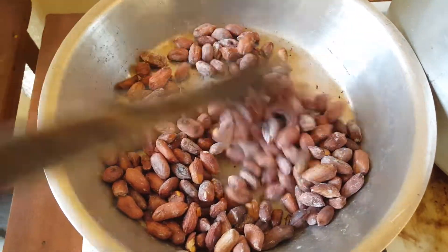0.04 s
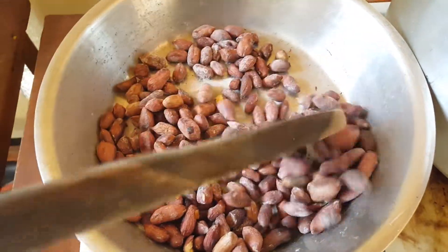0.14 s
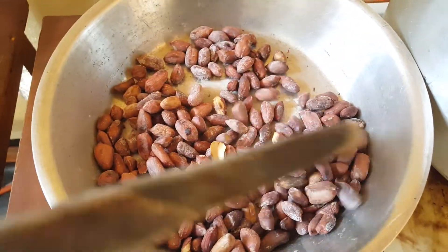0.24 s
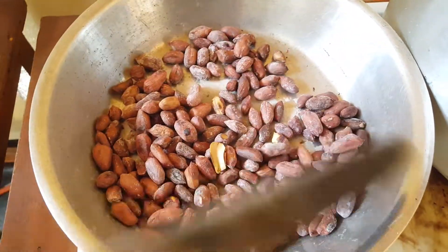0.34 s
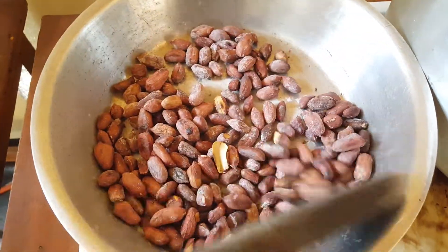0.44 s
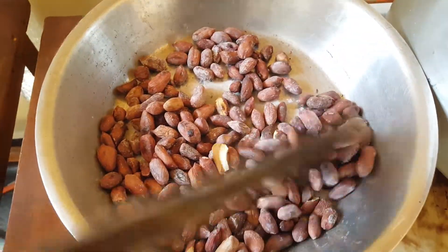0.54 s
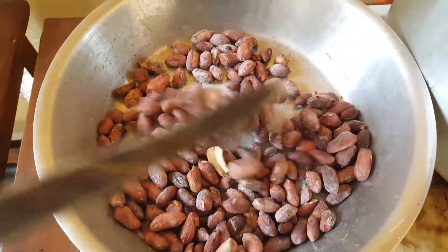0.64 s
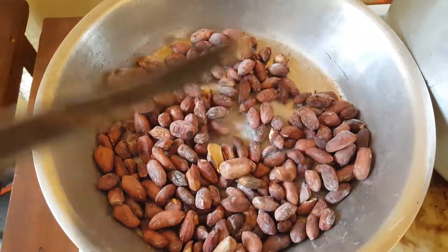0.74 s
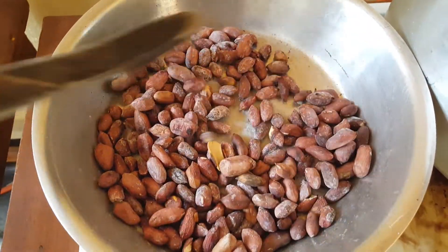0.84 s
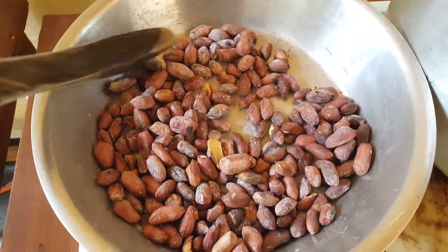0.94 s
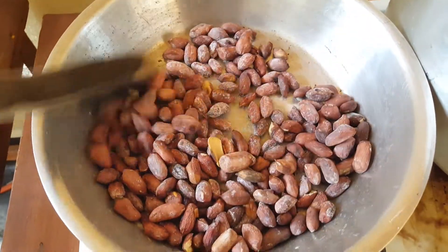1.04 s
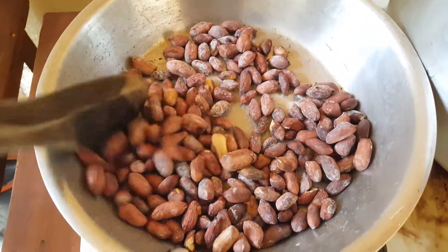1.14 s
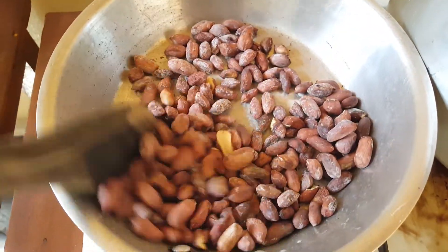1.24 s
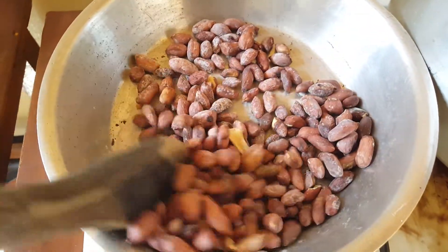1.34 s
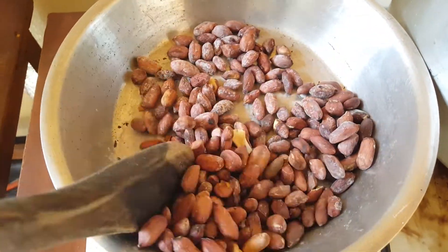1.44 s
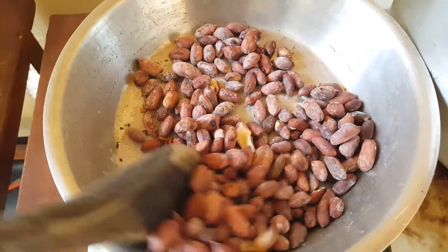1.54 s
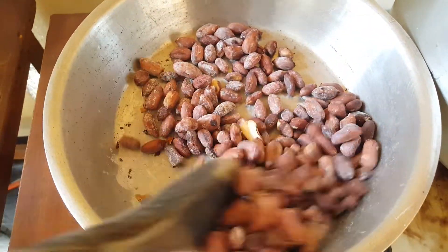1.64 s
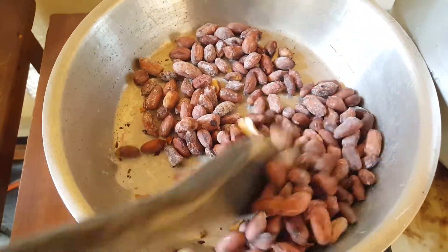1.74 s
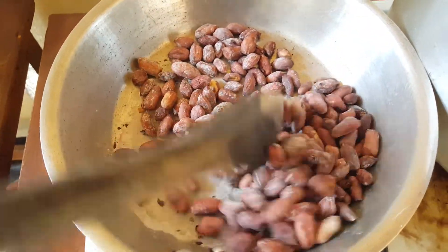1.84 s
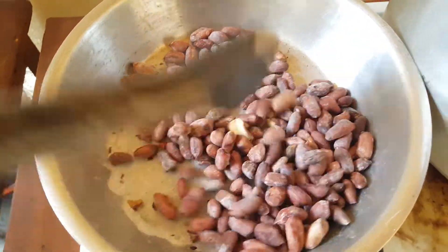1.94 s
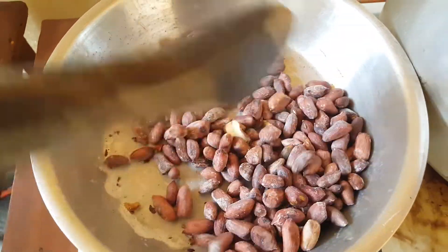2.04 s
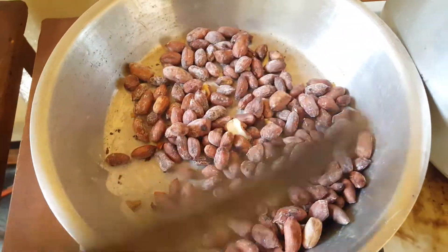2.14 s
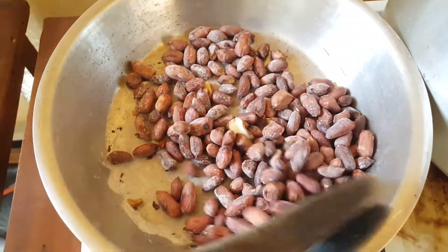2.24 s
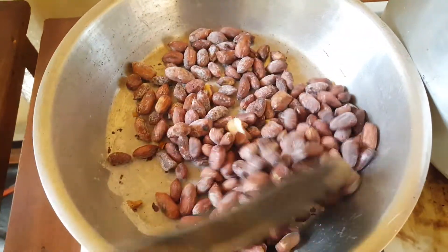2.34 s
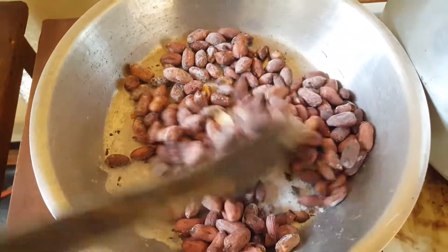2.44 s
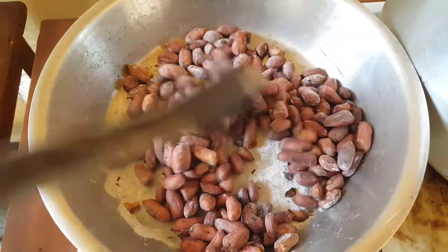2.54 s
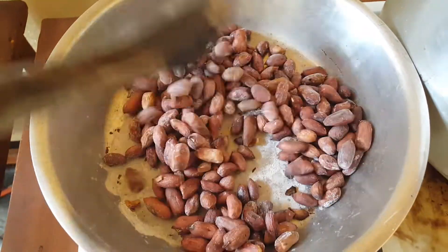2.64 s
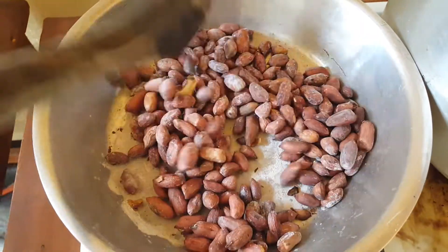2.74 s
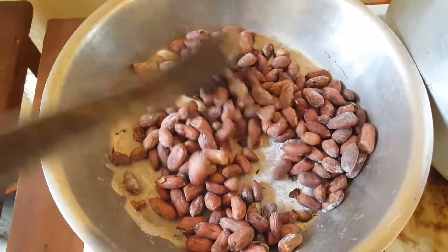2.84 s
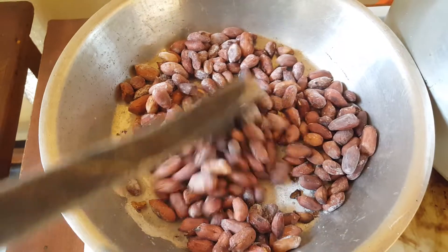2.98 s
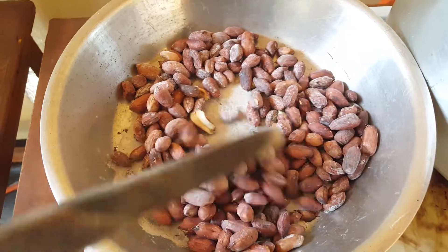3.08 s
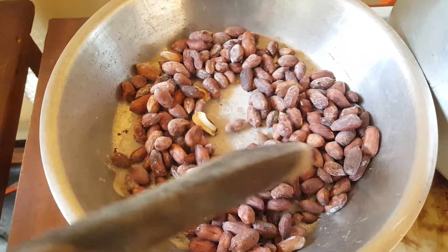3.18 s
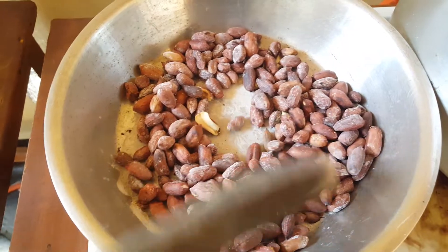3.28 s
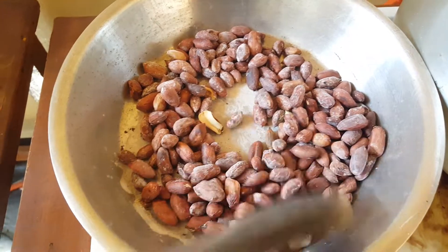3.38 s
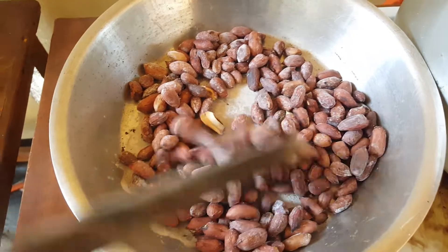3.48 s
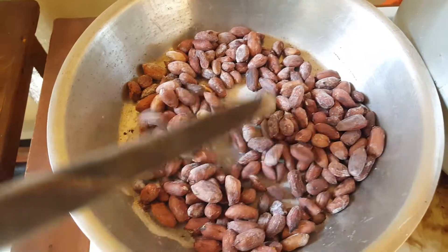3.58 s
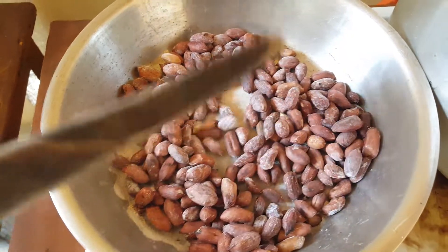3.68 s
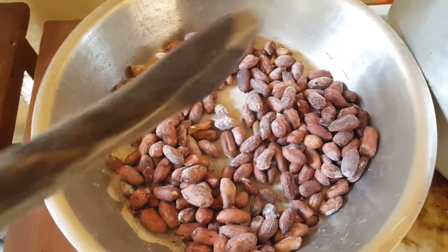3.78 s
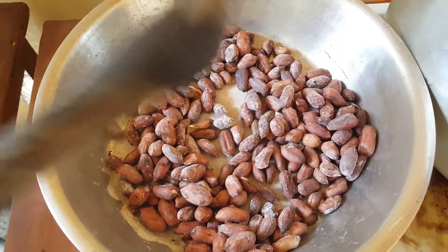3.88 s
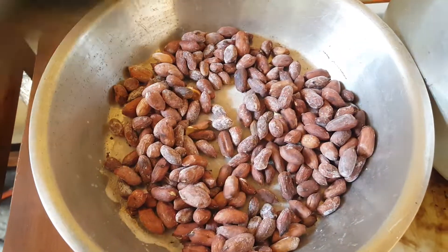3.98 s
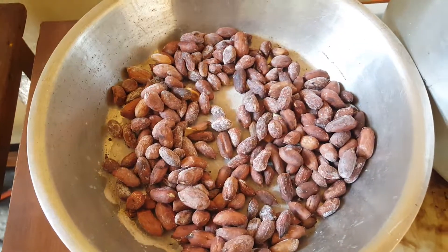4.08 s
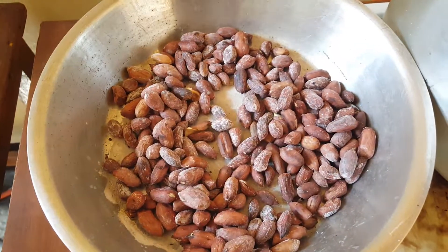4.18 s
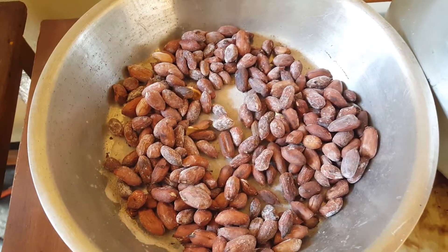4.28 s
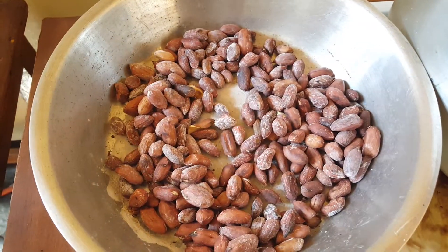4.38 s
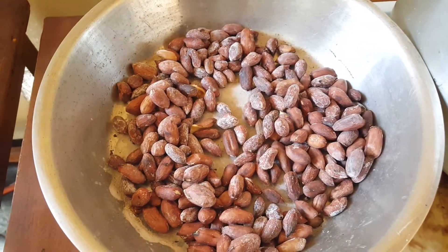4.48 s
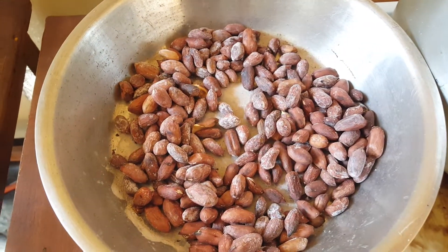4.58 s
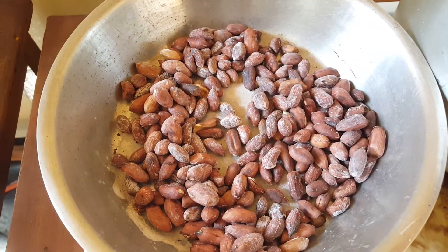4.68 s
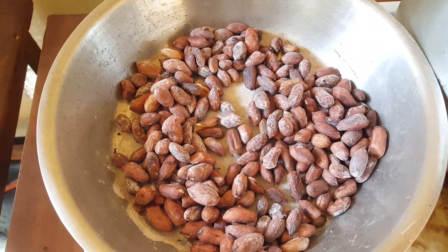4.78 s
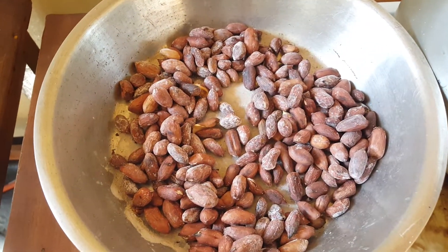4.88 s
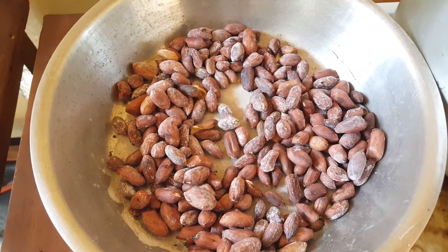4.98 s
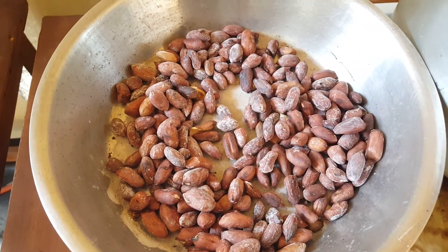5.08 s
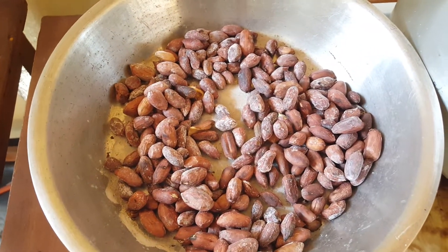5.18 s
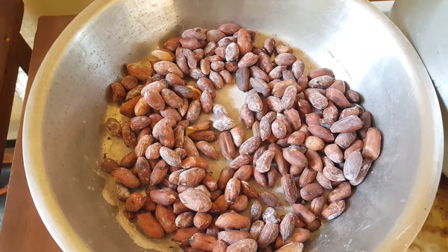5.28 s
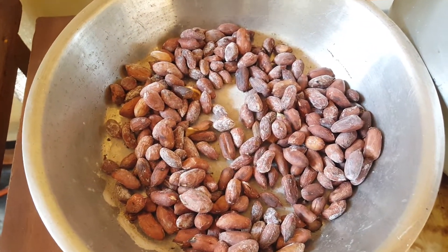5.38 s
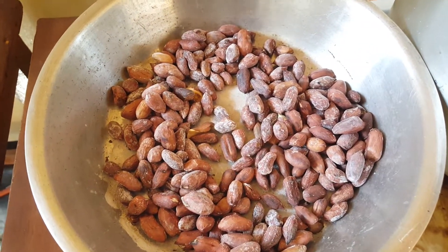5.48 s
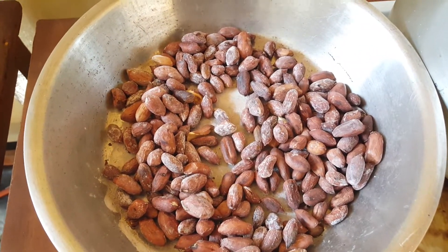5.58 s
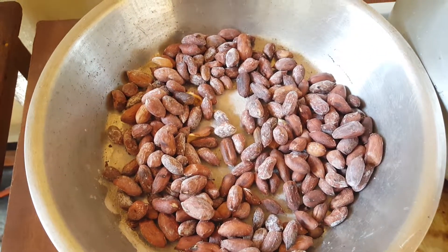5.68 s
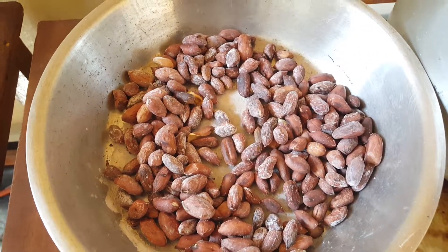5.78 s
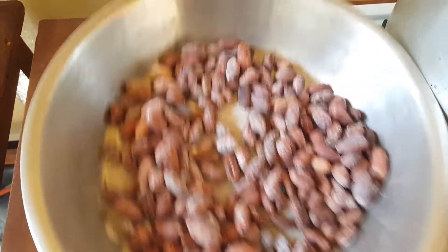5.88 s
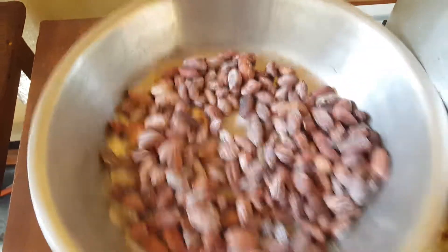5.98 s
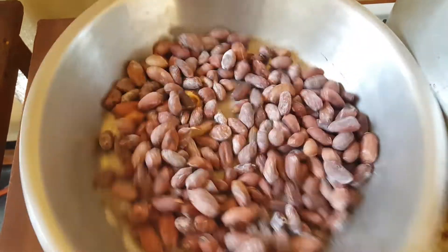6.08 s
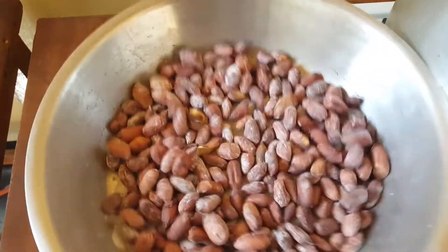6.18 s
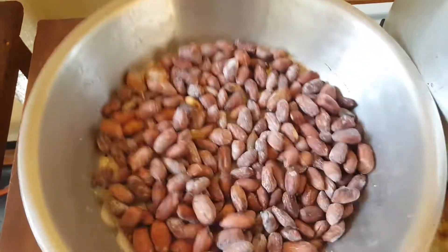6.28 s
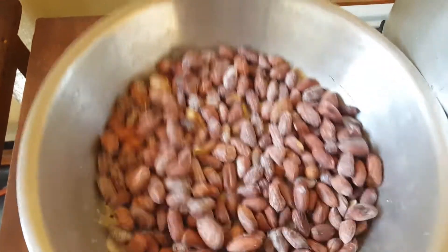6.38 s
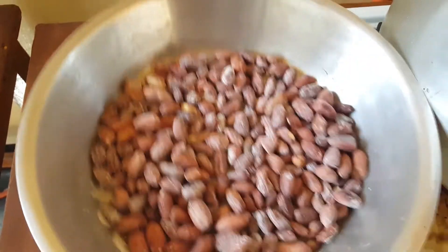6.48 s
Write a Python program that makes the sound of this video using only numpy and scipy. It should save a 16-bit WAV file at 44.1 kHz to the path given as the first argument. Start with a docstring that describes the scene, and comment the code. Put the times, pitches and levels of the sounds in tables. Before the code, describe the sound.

Nuts clatter and knock on ringing metal as they are stirred, then faint ticking, a wooden thud on the table, and a final rattling shake.

```python
"""Nuts tumble and knock on a thin metal pan as a wooden spatula stirs them, close by in a small kitchen.
The blade scrapes the bottom; the spatula is laid on the table; hot skins tick, and a far whistle
swells in the pause; at the end the pan is shaken. Random contacts drive pan modes and noise bursts;
knocks and table blows are decaying modes with noise, ticks short sines, whistle and air shaped noise."""
import sys
import numpy as np
from scipy import signal
from scipy.fft import rfft, irfft
from scipy.io import wavfile

SR = 44100
rng = np.random.default_rng(int(sys.argv[2]) if len(sys.argv) > 2 else 0)


def amplitude_ratio(level_db):
    """Convert a level in decibels to the matching linear amplitude (field) ratio."""
    exponent = np.asarray(level_db, float) / 20
    return 10 ** exponent


def transcribe(signal):
    """Save signal, clipped to [-1, 1], as a 16-bit WAV file at the path in sys.argv[1]."""
    frames = np.atleast_2d(signal).T
    limited = np.clip(frames, -1, 1)
    pcm = np.round(limited * 32767).astype(np.int16)
    wavfile.write(sys.argv[1], SR, pcm)


N = 287528
RING_SAMPLES = SR * 7 // 10

# loaded pan modes: (frequency [Hz], level [dB], t60 [s])
PAN_MODES = [(80, -4, .2), (144, 0, .4), (234, -9.5, .13), (313, -8, .15), (372, -1, .13), (389, -1, .13),
             (515, -8, .12), (593, -8, .1), (779, -3, .06), (871, -2, .08), (1013, 0, .06), (1105, -1, .08),
             (1245, -4, .06), (1450, -2, .06), (1580, 4, .13), (1640, -2, .07), (1800, -4, .06),
             (2260, -2, .06), (2415, -1, .06), (2520, -4, .06), (2800, -8, .05), (3000, -11, .04),
             (3600, -16, .04), (3264, -8, .085), (4370, -23, .04), (4644, -22, .045), (5070, -22, .04),
             (5390, -22, .05), (6080, -27, .04)]
PAN_HZ = np.array(PAN_MODES)[:, 0]
# edges of the sway, bottom, and wall and rim registers: (frequency [Hz])
REGISTER_EDGES_HZ = [0, 190, 620, 20000]
# countless small modes, damped and shifted by nuts on the metal: (frequency [Hz], level [dB per Hz])
CLATTER_SPECTRUM = [(110, -4), (180, -16), (274, -19), (383, -4.5), (465, -13), (508, -14), (1100, -3),
                    (1290, -10.5), (1590, -4), (2030, -7.5), (2380, -4), (3630, -25.5), (12000, -58),
                    (15600, -74), (22000, -120)]
# scraping colour: (frequency [Hz], level [dB per Hz])
SCRAPE_SPECTRUM = [(1760, -44), (3000, -3), (3380, -4), (4050, -10.5), (5480, -10), (7150, -13),
                   (8880, -10.5), (10100, -17.5), (14000, -14), (16000, -20)]
# spatula sweeps through the nuts:
# (start [s], length [s], tumbling nuts [dB], push on the bottom [dB], blade and skins scraping [dB])
SWEEPS = [(0.0, 0.16, -31, -43, -42), (.47, 0.096, -69, -48.5, -51.5), (.61, 0.14, -39, -43.5, -52.5),
          (1.05, 0.16, -40, -37.5, -46), (1.21, 0.18, -37, -40, -38), (1.6, 0.18, -38, -50, -44.5),
          (1.8, 0.127, -35.5, -52, -51.5), (1.92, 0.11, -37.5, -40, -54), (2.29, 0.18, -34.5, -39, -44),
          (2.45, 0.13, -31, -47, -42), (2.68, 0.146, -37.5, -77, -55), (2.85, 0.1, -32, -39, -45.5),
          (3.0, 0.11, -31, -40.5, -42.5), (3.4, 0.15, -42.5, -41, -50.5), (3.7, 0.034, -41, -56, -57)]
# jerks of the hand shaking the pan:
# (start [s], length [s], tumbling nuts [dB], push on the bottom [dB], skins scraping [dB])
SHAKES = [(5.82, .06, -59.5, -49.5, -70), (5.9, 0.071, -41, -41, -44), (6.02, 0.038, -31, -27, -38),
          (6.12, 0.11, -30.5, -29.5, -39), (6.3, .25, -34.5, -30.5, -42.5)]
# room tone colour: (frequency [Hz], level [dB per Hz])
AIR_SPECTRUM = [(15, -26), (25, -13), (87, -6.5), (114, -12), (161, -11), (180, -29), (212, -13.5),
                (363, -22), (439, -20), (754, -27.5), (1330, -24.5), (1480, -26.5), (6210, -44),
                (14400, -49), (16000, -38)]
# room tone: (frequency [Hz], left-right likeness [-1..1])
LIKENESS = [(60, 1), (180, 0.97), (550, 0.67), (1650, -0.31), (4970, 0.16), (15000, -0.27)]
# echo decay: (frequency [Hz], t60 [s])
KITCHEN_T60 = [(100, 0.66), (1000, 0.42), (4000, 0.19), (12000, 0.4)]
# clear knocks: (time [s], level [dB], pitch [Hz], boom re knock [dB], crack re knock [dB])
KNOCKS = [(0.049, -15.5, 1570, -8, -29), (0.068, -15, 1580, -24, -24), (0.121, -9, 890, -23, -22),
          (0.159, -26.5, 915, -35, -0.5), (0.212, -15, 1046, -37, -35), (0.24, -15.5, 960, -28, -31),
          (0.26, -5.5, 1830, -41, -54), (0.465, -15, 1547, -3, -49), (0.518, -22.5, 1670, -2.5, -16.5),
          (0.59, -17.5, 1140, -8, -16.5), (0.623, -15.5, 1060, -12, -25), (0.647, -11.5, 1010, -11, -25.5),
          (0.679, -10.5, 1010, -17, -19.5), (0.751, -27, 970, -26, -14.5), (0.772, -13, 1580, -26, -14.5),
          (0.907, -31, 1640, -31, -23), (0.921, -28, 1600, 2.5, -20), (0.93, -17, 1650, 0, -22),
          (0.938, -10.5, 2310, -16, -24), (0.948, -7.5, 1630, -9, -18), (1.093, -9, 1030, -10, -31),
          (1.187, -22, 1580, -13, -19), (1.213, -22, 1440, -28, -25), (1.336, -22.5, 2520, -6.5, -7),
          (1.411, -23, 1520, -5, -15), (1.477, -29, 905, -11, -33), (1.523, -32.5, 1500, -17, -17),
          (1.599, -29, 2180, -7, -28), (1.642, -20.5, 2200, -8, -21), (1.68, -13.5, 1700, -11, -25),
          (1.694, -7, 1606, -13.5, -25), (1.725, -10.5, 1650, -17, -27), (1.785, -9.5, 1046, -43, -38),
          (1.839, -19, 1570, -36, -24), (1.89, -16, 1090, -31, -30), (1.937, -14, 1500, -20, -40),
          (1.975, -18, 2270, -22, -24.5), (2.071, -35.5, 1090, -5, -11.5), (2.238, -21, 1540, -23, -23),
          (2.246, -17.5, 1640, -6, -23), (2.272, -9, 1560, -22, -30), (2.282, -11, 1000, -10, -13.5),
          (2.435, -17, 750, -16, -19), (2.481, -12, 2250, -41, -22), (2.499, -12.5, 1660, -39, -19),
          (2.531, -13.5, 2390, -11.5, -27), (2.554, -11.5, 1660, -45, -27), (2.591, -20, 1090, -6, -29),
          (2.627, -13, 2400, -29, -26), (2.637, -11.5, 2430, -36, -23), (2.665, -19, 1580, -16, -28),
          (2.71, -20.5, 2510, -31, -25), (2.725, -17, 2430, -27, -28), (2.766, -17, 1560, -35, -24),
          (2.808, -13, 3280, -25, -17), (2.833, -11.5, 1960, -12.5, -38), (2.873, -23.5, 990, 0.5, -31),
          (2.897, -14.5, 705, -12, -18.5), (2.925, -15, 980, -12.5, -16.5), (2.938, -11, 590, -24, -21),
          (2.967, -14.5, 596, -31, -24), (3.053, -14.5, 2350, -17, -20), (3.096, -27, 1040, -19, -26),
          (3.123, -14, 3256, -33, -20.5), (3.192, -30.5, 1630, -44, -36), (3.211, -31.5, 1600, -11, -24),
          (3.268, -34, 980, -14, -20), (3.329, -44, 1620, -15, -19), (3.362, -32, 1050, -24, -23),
          (3.389, -25, 1090, -4.5, -11.5), (3.44, -27.5, 1520, 2, -11), (3.496, -16, 1620, -15, -24),
          (3.516, -13, 1050, -20, -21), (3.548, -22, 890, -22, -29), (3.589, -12, 1730, -50, -25.5),
          (3.626, -23, 1840, -39, -23), (3.699, -15, 1090, -25, -25), (3.713, -15.5, 1680, -24, -36),
          (3.733, -25, 2430, -25, -37), (3.889, -35, 964, -11, -35), (5.779, -39.5, 680, -11, -24),
          (5.856, -31.5, 1560, -5, -23), (5.874, -26, 1270, -2, -27), (5.895, -14, 590, -10, -18.5),
          (5.931, -12, 1090, -8, -33), (5.972, -25, 770, 5.5, -31), (6.022, -13, 2150, -19, -12),
          (6.04, -11.5, 850, -12, -34), (6.125, -15, 1100, -25, -20), (6.195, -5.5, 1090, -16, -22),
          (6.252, -25.5, 1110, 4, -30), (6.314, -16, 750, -19, -22), (6.349, -21, 870, -24, -27),
          (6.369, -12.5, 775, -28, -29), (6.385, -14.5, 745, -11.5, -21)]
# clear ticks of hot skins: (time [s], level [dB], frequency [Hz])
CLEAR_TICKS = [(3.921, -51, 8800), (3.9544, -46, 8300), (4.0194, -42.5, 8810), (4.5246, -56, 14800),
               (4.554, -56, 7740), (4.6129, -50, 14430), (4.7618, -42, 5600), (5.0676, -52, 5700),
               (5.261, -56, 5380), (5.3058, -58, 5030), (5.3612, -57, 15300), (5.5737, -54, 5280),
               (5.7264, -50, 5700)]
# spatula laid down, then a small bounce: (time [s], level [dB])
LAID_DOWN = [(4.761, -12), (4.98, -28)]
# ringing of table and pan: (frequency [Hz], level [dB], t60 [s])
TABLE_MODES = [(92.5, -17, 1.8), (144.3, -6.5, 1.2), (204.5, -9.5, 0.25), (298, 6.5, 0.034),
               (386, -10, 0.38), (487, 0.5, 0.095), (513, -4, 0.22), (620, -21.5, 0.43), (795, -8, 0.33),
               (885, -11, 0.32), (1080, -4, 0.081), (1090, -19, .15), (1330, -22, 0.18), (1793, -6, .26),
               (1890, -9, .3), (2260, -35, .1), (4700, -19.5, 0.059), (5500, -33, 0.14)]
# far whistle bands: (centre [Hz], width [Hz], level at full swell [dB])
WHISTLE_BANDS = [(2170, 420, -65), (3750, 250, -71)]
# two microphone ports: (frequency [Hz], left-right difference [dB])
PORTS = [(60, -1), (110, -2.5), (200, 1.5), (380, -2), (700, 3), (1290, 0), (2380, -7), (4400, -7.5),
         (8120, 5), (15000, 3.5)]


def rms_one(x):
    """Scale to unit rms."""
    return x / np.sqrt(np.mean(x ** 2) + 1e-20)


def at_hz(points, hz):
    """Read a table on a log-frequency axis."""
    table_hz, values = np.array(points)[:, 0], np.array(points)[:, 1]
    return np.interp(np.log(hz + 1), np.log(table_hz), values)


def coloured(x, spectrum):
    """Shape the last axis by a dB spectrum."""
    samples = x.shape[-1]
    gain = amplitude_ratio(at_hz(spectrum, np.fft.rfftfreq(samples, 1 / SR)))
    return irfft(rfft(x) * gain, samples)


def bandpass(x, order, low_hz, high_hz):
    """Butterworth band-pass."""
    return signal.sosfilt(signal.butter(order, [low_hz, high_hz], "band", fs=SR, output="sos"), x)


def add(out, sound, start_s):
    """Mix a stereo sound in at start_s."""
    i = round(start_s * SR)
    out[:, i:i + sound.shape[1]] += sound[:, :N - i]


def strike(modes, spread_db, contact_s, detune, unlike_hz=1700):
    """Return a blow on decaying modes: fresh strengths, one of five detunings, port phases unlike in the treble."""
    hz, db, t60_s = np.transpose(modes)[:, :, None]
    t = np.arange(RING_SAMPLES) / SR
    detuned = [hz * (1 + detune * rng.standard_normal(hz.shape)) for _ in range(5)]
    waves = [np.exp(-np.log(1000) * t / t60_s + 2j * np.pi * f * t).astype(np.complex64)
             for f in detuned]
    rise = np.sin(np.pi / 2 * np.minimum(t / contact_s, 1)) ** 2   # a soft body takes time to push

    def blow(mask):
        """Sum the masked modes to peak 1 before the rise."""
        draw = rng.standard_normal((3, len(modes)))
        phase_rad = draw[1:] * np.minimum((hz[:, 0] / unlike_hz) ** 2, 3)
        gain = mask * amplitude_ratio(db[:, 0] + spread_db * draw[0])
        strength = (gain * np.exp(1j * phase_rad)).astype(np.complex64)
        ring = (strength @ waves[rng.integers(5)]).imag
        return rise * ring / np.abs(ring).max()
    return blow


def burst(spectrum, low_hz, high_hz, t60_s, alike, rise_s=0.00089):
    """Decaying coloured noise, peak 1: many small modes at once; the right port is further off."""
    t = np.arange(RING_SAMPLES // 4) / SR
    white = rng.standard_normal((3, len(t)))
    delay_samples = 12 if low_hz > 2000 else 5
    common = np.stack([white[0], np.roll(white[0], delay_samples)])
    white = alike * common + np.sqrt(1 - min(alike, 1) ** 2) * white[1:]
    noise = bandpass(coloured(white, spectrum), 1, low_hz, min(high_hz, 17000))
    noise = noise * amplitude_ratio(-60 * t / t60_s) * np.minimum(t / rise_s, 1)
    return np.pad(noise / np.abs(noise).max(), ((0, 0), (0, RING_SAMPLES - len(t))))


def register(k):
    """Mask of modes in sway (0), bottom (1) or wall and rim (2)."""
    return np.digitize(PAN_HZ, REGISTER_EDGES_HZ) == k + 1


def effort(moves):
    """Each move rises, holds and dies away; gains for nuts, push and scrape."""
    rises_db_per_s, falls_db_per_s = (307, 400.5, 318), (345, 250, 400)   # nuts, push, scrape
    start_s, length_s, *levels_db = np.array(moves).T[:, :, None]
    t = np.arange(0, N + 64, 64) / SR
    before_s = np.maximum(start_s - t, 0)
    after_s = np.maximum(t - start_s - length_s, 0)
    shapes = [amplitude_ratio(db - rise * before_s - fall * after_s).max(0)
              for db, rise, fall in zip(levels_db, rises_db_per_s, falls_db_per_s)]
    return np.array([np.interp(np.arange(N) / SR, t, shape) for shape in shapes])


def grains(per_s, size_db, clump_db):
    """Random contacts, uneven in size, coming in clumps of about 20 ms."""
    knots = np.arange(0, N + 900, 900)
    clump = np.interp(np.arange(N), knots, rng.standard_normal(len(knots)))
    born = rng.random(N) < per_s * amplitude_ratio(clump_db * clump) / SR
    size = amplitude_ratio(size_db * np.minimum(rng.exponential(1, N), 4))
    return born * size * rng.choice([-1, 1], N)


def stirring(pan):
    """Contacts fall on eight spots of the pan, each with its own ring; scraping is densest and brightest."""
    swept, shaken = effort(SWEEPS), effort(SHAKES)
    nuts, push, scrape = swept + shaken
    sway = amplitude_ratio(-3.5) * swept[1] + amplitude_ratio(-17.5) * shaken[1]   # the whole pan sways less when held and shaken
    treble = (PAN_HZ / 5000) ** 3

    def bottom_ring():
        return pan(register(1)) + 0.46 * burst(CLATTER_SPECTRUM, 260, 710, t60_s=0.16, alike=0.36)

    def nuts_ring():
        return pan(register(2)) + 1.03 * burst(CLATTER_SPECTRUM, 900, 13000, t60_s=0.044, alike=0.69)

    def scrape_ring():
        noise = burst(SCRAPE_SPECTRUM, 2500, 25000, t60_s=0.023, alike=0.66, rise_s=0.00025)
        return 0.66 * pan(treble) + noise

    # (ring, gain, contacts [per s], size spread [dB])
    layers = [(lambda: pan(register(0)), sway, 60, 9.1), (bottom_ring, push, 200, 3.9),
              (nuts_ring, nuts, 350, 3.26), (scrape_ring, scrape, 4000, 5.0)]
    out = np.zeros((2, N))
    for make_ring, gain, per_s, size_db in layers:
        contacts = rms_one(grains(per_s, size_db, clump_db=3.0)) * gain
        spot = rng.integers(0, 8, N)
        for k in range(8):
            ring = make_ring()
            ring /= np.sqrt(np.mean(np.sum(ring ** 2, axis=1)))
            out += signal.oaconvolve((contacts * (spot == k))[None], ring, axes=1)[:, :N]
    return out


def kitchen(x):
    """Diffuse echo: noise dying band by band, alike at both ports in bands starting below 700 Hz."""
    t, tail = np.arange(RING_SAMPLES) / SR, 0
    for low_hz in 60 * 2. ** np.arange(8):
        noise = rng.standard_normal((1 if low_hz < 700 else 2, RING_SAMPLES))
        band = bandpass(noise, 2, low_hz, 2 * low_hz)
        tail = tail + band * amplitude_ratio(-60 * t / at_hz(KITCHEN_T60, 2.7 * low_hz)) * np.ones((2, 1))
    tail = tail * np.clip(t / 0.013, 0, 1)
    tail = tail / np.sqrt(np.sum(tail ** 2) / 2)
    return signal.oaconvolve(x.mean(0)[None], tail, axes=1)[:, :N]


def room_tone():
    """Steady air and far rumble: shaped noise, alike at both ports in the bass."""
    mid, side = rfft(rng.standard_normal((2, N)))
    alike = np.clip(at_hz(LIKENESS, np.fft.rfftfreq(N, 1 / SR)), -1, 1)
    both = np.sqrt(1 + alike) * mid + np.sqrt(1 - alike) * side * [[1], [-1]]
    return amplitude_ratio(-54.5) * rms_one(coloured(irfft(both, N), AIR_SPECTRUM))


def knocks(pan):
    """A nut or the blade hits metal: a woody knock, pan modes and clatter near its pitch, a boom, a crack."""
    out, t = np.zeros((2, N)), np.arange(RING_SAMPLES) / SR
    swell = np.minimum(t / 0.01, 1)   # the heavy bottom takes a few ms to get going
    for start_s, db, hz, boom_db, crack_db in KNOCKS:
        metal = pan(register(2) * (.5 + np.exp(-(np.log(PAN_HZ / hz) / 1.4) ** 2)))
        wood = np.sin(2 * np.pi * hz * t) * amplitude_ratio(-60 * t / 0.039)
        clatter = burst(CLATTER_SPECTRUM, 0.61 * hz, 3.4 * hz, t60_s=0.045, alike=0.95)
        # the snap of first contact
        snap = burst(CLATTER_SPECTRUM, 0.6 * hz, 5.0 * hz, t60_s=0.0058, alike=0.9, rise_s=0.00025)
        knock = 0.24 * metal + 0.22 * wood + 0.43 * clatter + 0.28 * snap

        boom = pan(register(1)) + 0.34 * pan(register(0))
        boom += 0.7 * burst(CLATTER_SPECTRUM, 176, 360, t60_s=0.21, alike=0.98)

        # a sharper crack sits higher
        crack_hz = 5240 * 2 ** (.015 * crack_db + 0.078 * rng.standard_normal())
        glint = pan(np.exp(-(np.log(PAN_HZ / crack_hz) / 0.17) ** 2))
        body = burst(SCRAPE_SPECTRUM, 0.89 * crack_hz, 1.4 * crack_hz, t60_s=0.071, alike=0.35, rise_s=0.0014)
        edge = burst(SCRAPE_SPECTRUM, crack_hz, 16000, t60_s=0.015, alike=0.5, rise_s=0.0003)
        crack = 0.43 * glint + body + 0.5 * edge
        sound = knock + amplitude_ratio(boom_db) * swell * boom + amplitude_ratio(crack_db) * crack
        add(out, amplitude_ratio(db + 5.0) * sound, start_s)
    return out


def ticks():
    """Hot skins split with brief ticks, decaying sines of some 1 ms: a few clear, many small."""
    small_per_s, small_db, small_spread_db = 17, -54.5, 7.5
    low_hz, high_hz = 5060, 14900
    out, t = np.zeros((2, N)), np.arange(200) / SR
    draw = rng.random((200, 3))
    times_s = np.cumsum(-np.log(draw[:, 0])) / small_per_s
    levels_db = small_db + small_spread_db * (draw[:, 1] - .5)
    pitches_hz = low_hz * (high_hz / low_hz) ** draw[:, 2] ** 3
    small = np.c_[times_s, levels_db, pitches_hz]
    envelope = amplitude_ratio(-60 * t / 0.0014) * np.minimum(t / 0.00013, 1)
    for start_s, db, hz in [*CLEAR_TICKS, *small[times_s < N / SR]]:
        wave = np.sin(2 * np.pi * hz * t + rng.uniform(0, 2 * np.pi, (2, 1)))
        add(out, amplitude_ratio(db + 13.0) * wave * envelope, start_s)
    return out


def spatula_down():
    """The handle lands over some 20 ms, ringing table and pan modes; the bounce is soft and dull."""
    out = np.zeros((2, N))
    table = strike(TABLE_MODES, spread_db=1.5, contact_s=.001, detune=.012)
    table_hz = np.array(TABLE_MODES)[:, 0]
    for (start_s, db), bright_hz, thud_share in zip(LAID_DOWN, (9000, 560), (.55, .3)):
        lowpass = signal.butter(3, bright_hz * 1.7, fs=SR, output="sos")
        for late_s, part_db in ((0, -3.0), (.014, -4.0), (.021, -7.0)):
            ring = table(1 / (1 + (table_hz / bright_hz) ** 4))
            thud = burst(CLATTER_SPECTRUM, 350, 730, t60_s=0.077, alike=0.71, rise_s=0.0022)
            landing = signal.sosfilt(lowpass, ring + thud_share * thud)
            add(out, amplitude_ratio(db + part_db) * landing, start_s + late_s)
    rustle = burst(SCRAPE_SPECTRUM, 2100, 6900, t60_s=0.082, alike=0.36)
    add(out, amplitude_ratio(-39.0) * rustle, LAID_DOWN[0][0])
    return out


def whistle():
    """Faint far whistle: noise through two narrow bands, swelling and fading."""
    start_s, length_s = 5.12, 0.49
    phase = np.clip((np.arange(N) / SR - start_s) / length_s, 0, 1)
    out = 0
    for hz, width_hz, db in WHISTLE_BANDS:
        band = bandpass(rng.standard_normal((2, N)), 2, hz - width_hz / 2, hz + width_hz / 2)
        out = out + amplitude_ratio(db) * rms_one(band)
    return out * np.sin(np.pi * phase)


def scene():
    """Sources near the microphone, their echo, the room tone and the far whistle."""
    pan = strike(PAN_MODES, spread_db=4.0, contact_s=.0006, detune=.008)
    near = stirring(pan) + knocks(pan) + ticks() + spatula_down()
    # a small pan radiates no deep bass
    near = signal.sosfilt(signal.butter(4, 66, "high", fs=SR, output="sos"), near)
    return near + amplitude_ratio(-5.5) * kitchen(near) + room_tone() + whistle()


def top_cut(x):
    """Nothing passes above the cut-off."""
    return signal.sosfilt(signal.butter(12, 16610, fs=SR, output="sos"), x)


def record(dry):
    """Each port has its own colour, half the difference each; the top is cut."""
    ports = [coloured(channel, [(hz, share * db) for hz, db in PORTS])
             for channel, share in zip(dry, (.5, -.5))]
    mix = signal.sosfilt(signal.cheby2(18, 60, 16650, fs=SR, output="sos"), ports)
    return top_cut(mix)


dry = scene()
out = record(dry)
transcribe(out)
```